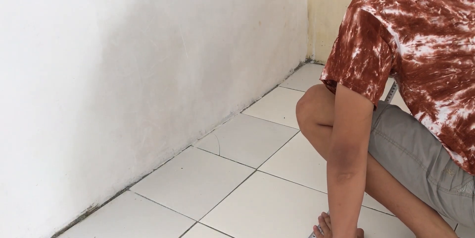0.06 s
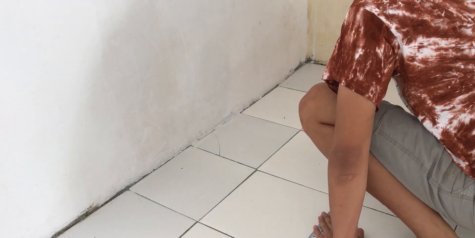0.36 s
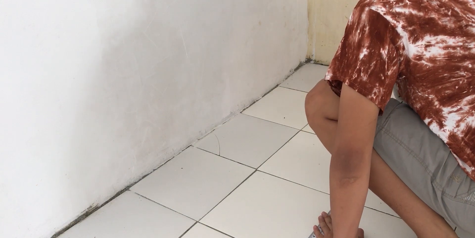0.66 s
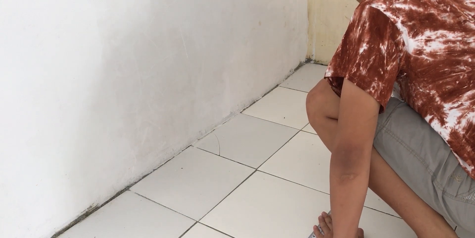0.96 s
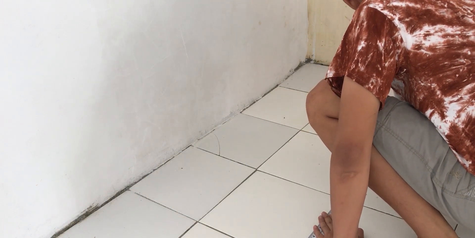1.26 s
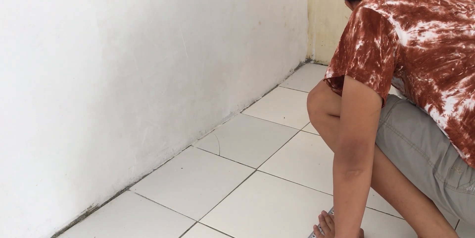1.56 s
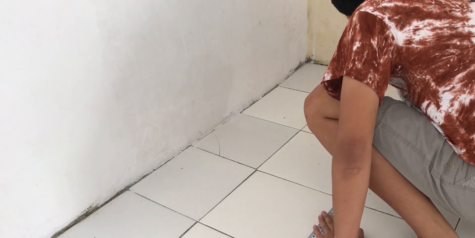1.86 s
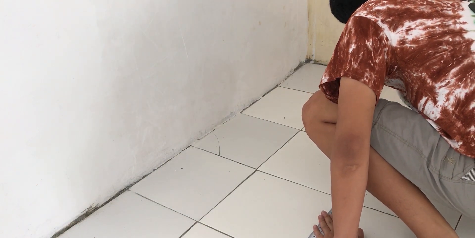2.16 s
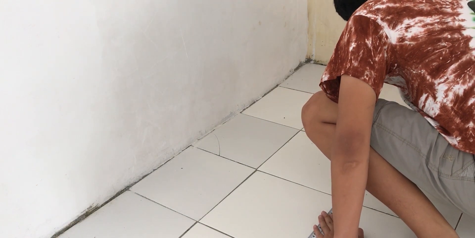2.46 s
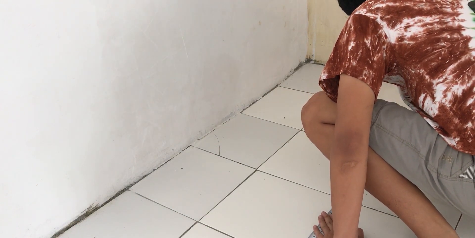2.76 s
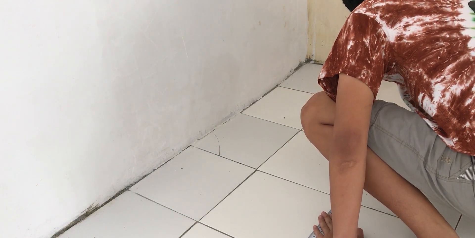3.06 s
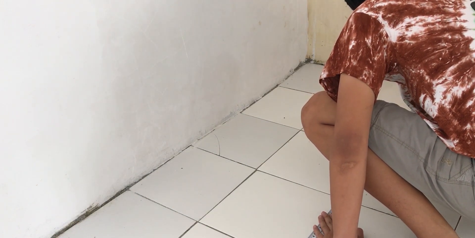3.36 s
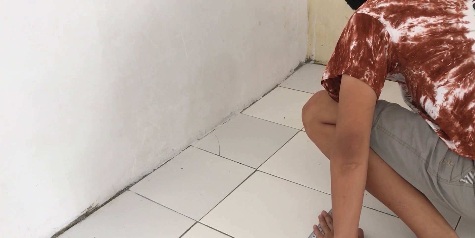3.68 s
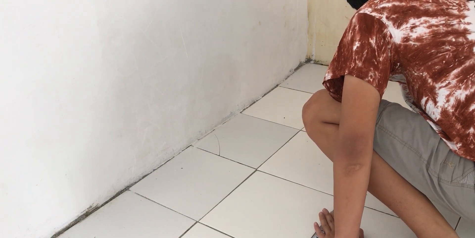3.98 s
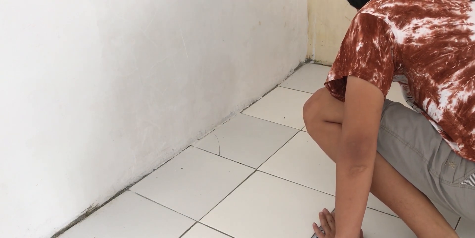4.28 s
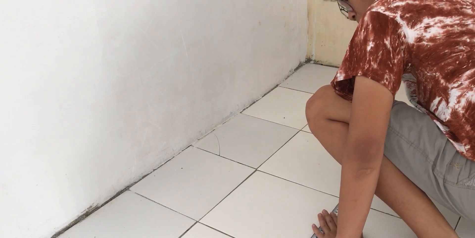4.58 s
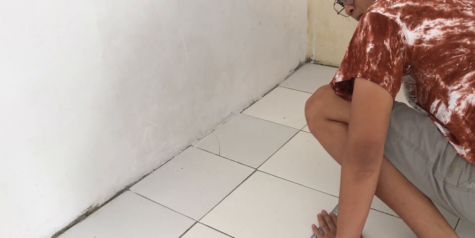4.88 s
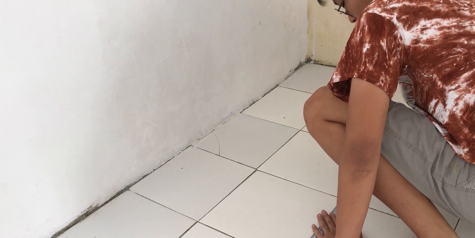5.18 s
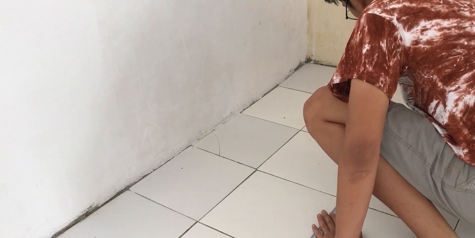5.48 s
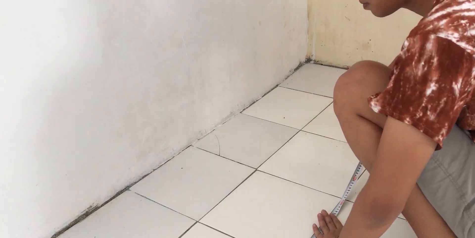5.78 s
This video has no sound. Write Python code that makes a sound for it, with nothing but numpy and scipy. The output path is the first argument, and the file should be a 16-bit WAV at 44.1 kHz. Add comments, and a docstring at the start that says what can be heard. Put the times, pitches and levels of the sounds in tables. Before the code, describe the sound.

In a bare tiled room, a tape measure is drawn out in short, rasping tugs, its thin steel blade snapping and rattling. A quiet stretch of small taps and faint squeaks leads to a double click, and then a few short scrapes on the floor at the end. Heard from a little distance, each sound has a short, bright echo, over a soft, wavering low hum.

```python
"""Tape measure in a bare, tiled room

A steel tape is drawn from its case, clicks, and is dragged over the floor tiles. The thin blade
rasps at the mouth of the case, snaps as it buckles and scrapes on the floor. One microphone
stands far enough off that the bright tail from the hard walls is nearly as loud as the direct
sound. A low hum lies underneath, in the room tone."""
import sys
import numpy as np
from scipy import signal
from scipy.fft import rfft, irfft
from scipy.io import wavfile

SR = 44100
rng = np.random.default_rng(int(sys.argv[2]) if len(sys.argv) > 2 else 0)


def pcm_store(signal):
    """Save signal as 16-bit PCM."""
    levels = np.round(np.clip(np.atleast_2d(signal), -1, 1) * 32767)
    wavfile.write(sys.argv[1], SR, levels.astype(np.int16).T)


N = 265923

# pulls on the tape: (start [s], rise [s], hold [s], level [dB], brightness [dB/octave])
BLADE_PULLS = [(.366, 0.025, 0.031, -39, -4), (.44, 0.085, 0.047, -43.5, -4.5),
               (0.569, .01, 0.02, -30, 1.5), (0.602, 0.029, 0.026, -27.5, 3.5),
               (0.672, 0.011, .015, -38.5, -0.5), (0.739, 0.013, 0.031, -39.5, -1),
               (0.868, 0.03, .012, -42, 4.5), (0.986, 0.026, 0.01, -46.5, 8)]
# shiver after a snap: (start [s], rise [s], hold [s], level [dB], brightness [dB/octave])
BLADE_SHIVERS = [(1.186, 0.0049, 0.083, -44.5, 2)]
# strokes on the tiles: (start [s], rise [s], hold [s], level [dB], brightness [dB/octave])
TILE_DRAGS = [(0, 0.001, 0.024, -53.5, -1.5), (0.021, 0.021, 0.062, -47.5, 2),
              (0.169, 0.047, 0.048, -59, 0.5), (0.293, 0.033, 0.038, -61, -7.5),
              (3.741, 0.028, 0.0046, -64, 3.5), (3.885, 0.04, .02, -56, 7),
              (5.679, 0.0032, 0.019, -47, 1.5), (5.72, 0.032, 0.084, -53, 1),
              (5.844, 0.0087, 0.034, -48.5, 6.5), (5.916, 0.024, 0.064, -54, 0.5)]
# snaps and taps of the blade: (time [s], level [dB], brightness [dB/octave], chatter decay [s])
BLADE_SNAPS = [(.212, -52, -3, 0.0045), (.497, -41.5, -0.5, 0.0053), (0.5116, -36, 1, 0.0014),
               (.5556, -31.5, -1, 0.013), (.632, -29, -1, .003), (0.699, -35.5, 5, .003),
               (0.7276, -18.5, 1.5, 0.004), (0.7564, -28, 6, .002), (.832, -36, 6, .003),
               (1.1868, -37, 3, .007), (1.2658, -45, 0, .0027), (1.438, -58, 8, .0012),
               (1.514, -61.5, -3, .005), (1.584, -67, 3, 0.0022), (1.664, -56.5, -7, 0.024),
               (2.195, -67.5, 4.5, .003), (2.7267, -58, -8.5, 0.016), (4.2492, -57.5, -7, 0.019),
               (4.2801, -39.5, 0, .0055), (4.293, -42.5, 1, 0.012), (4.408, -55, 4, 0.0021),
               (4.653, -59.5, -5.5, .033), (4.7103, -61, 1, .011), (4.7506, -53, 3.5, 0.0046),
               (5.284, -69.5, 4, .028), (5.6813, -47.5, -5, 0.0056), (5.787, -42, -0.5, 0.0057),
               (5.9572, -50, 6, .006)]
# bends of the loose blade: (time [s], level [dB], length [s])
BLADE_FLEXES = [(0.759, -55.5, .14), (1.271, -60.5, 0.025)]
# scuffs of the case on the floor: (time [s], level [dB], length [s])
CASE_SCUFFS = [(.03, -73.5, 0.14), (5.79, -79, .05), (5.965, -79, 0.039)]
# bumps of the case in the hand: (time [s], relative level [dB], length [s], brightness [dB/octave])
CASE_BUMPS = [(1.44, -67.5, 0.014, 11.5), (1.665, -70, .04, 8), (2.675, -71, 0.058, -4),
              (2.736, -66, 0.044, -8.5)]
# catches of the steel: (time [s], pitch [Hz], width [Hz], level [dB], length [s])
STEEL_SQUEALS = [(0.023, 2390, 170, -53.5, 0.04), (0.21, 9300, 400, -67, 0.042),
                 (1.437, 10100, 700, -61, 0.0075), (1.634, 11540, 1094, -66.5, 0.036),
                 (2.621, 7600, 2200, -72, .083), (3.919, 1920, 180, -67.5, 0.03),
                 (4.282, 1500, 160, -63.5, 0.024), (4.751, 3050, 451, -63, 0.0092),
                 (5.681, 1952, 170, -53.5, 0.027), (5.753, 3520, 400, -54, 0.011),
                 (5.766, 8700, 1000, -50, .009), (5.787, 4200, 1200, -46, 0.0099),
                 (5.837, 1960, 200, -61, 0.073)]
# faint squeaks: (start [s], length [s], top pitch [Hz], level [dB])
THIN_SQUEAKS = [(2.117, 0.221, 4650, -66), (2.279, .18, 3480, -82), (3.875, .18, 4330, -72),
                (4.688, .14, 4340, -80), (5.238, 0.22, 4280, -81), (5.43, 0.186, 2550, -79.5)]

# spectrum of each kind of contact: (frequency [Hz], relative level [dB])
RASP_SPECTRUM = [(100, -24), (350, -22.5), (650, -13.5), (950, -16), (1400, -8.5), (2500, -2.5), (4000, 0),
                 (6200, 0), (8500, 0), (10300, -4), (12000, -6.5), (15500, -9.5)]
SHIVER_SPECTRUM = [(100, -16), (900, -11.5), (1400, -11), (2200, -11.5), (3900, -5.5), (4900, -6),
                   (5800, -1), (8400, -2), (10300, -15), (12400, -9), (15500, -14)]
SNAP_SPECTRUM = [(100, -33), (500, -16.5), (1000, -17), (1800, -9), (3700, -5.5), (4900, -9.5), (6300, 1),
                 (7700, -6), (8900, 1.5), (11000, -3.5), (12500, -4), (15500, -9)]
SCRAPE_SPECTRUM = [(100, -21.5), (400, -14.5), (1000, -9.5), (1600, -3), (3000, 0), (4400, 1.5),
                   (6500, 2.5), (7800, -2.5), (8800, 0), (10500, -6), (12000, -4), (15500, -12)]
# modes of the free blade, the case, and both on the floor: (pitch [Hz], width [Hz], relative level [dB])
BLADE_MODES = [(1370, 41, -4), (4040, 83, 2), (5370, 76, 4.5), (5695, 52, 3.5), (6300, 50, -3),
               (6200, 24.5, -6), (6975, 119.6, 5.5), (7740, 55, -0.5), (8260, 19.5, 1.5), (8130, 45, 4),
               (8900, 190, -7), (9850, 76, -5.5), (9470, 98, -0.5), (10700, 28, 3), (11650, 141, 7.5),
               (12000, 26, 1), (13000, 79, -1.5), (13600, 29, -2)]
CASE_MODES = [(800, 75, -8.5), (1400, 210, -3), (2260, 420, -1.5)]
FLOOR_CONTACT_MODES = [(632, 76, 12), (1947, 90, -2), (2587, 50, -0.5), (4400, 140, -10), (5700, 43, -4),
                       (5990, 41, -0.5), (8500, 150, -4.5), (9070, 83, 2), (11800, 47, -5)]

# decay of the room: (frequency [Hz], time to fall 60 dB [s])
ROOM_DECAY = [(150, 0.29), (600, 1), (2000, 0.69), (5000, 0.52), (9000, 0.44), (15000, 0.44)]
# steady room noise: (frequency [Hz], relative level [dB])
AIR_SPECTRUM = [(20, -26.5), (30, -13.5), (42, 1.5), (80, -4.5), (125, -10), (190, -12), (310, -16),
                (480, -22.5), (680, -23), (950, -25), (2000, -31.5), (4300, -35.5), (8000, -41),
                (15800, -44)]
# swells and dips of the hum: (middle [s], half length [s], level change [dB])
HUM_SWELLS = [(.15, 0.14, 1.5), (1.018, 0.023, 13), (2.08, 0.075, 4), (2.62, 0.085, 6.5), (2.88, 0.049, 11),
              (3.68, 0.09, -8.5), (4.358, .07, 9.5), (4.63, 0.1, -12), (5.599, .07, -9.5),
              (5.811, 0.056, 7.5)]
# dull noise above the hum: (time [s], relative level [dB])
DULL_LEVELS = [(0.1, -61), (0.15, -67.5), (0.91, -61), (0.94, -70), (1.25, -62.5), (2.12, -65.5),
               (2.23, -58.5), (2.67, -64.5), (2.97, -60), (3.64, -66.5), (3.72, -59.5), (4.72, -58.5),
               (5.84, -65), (5.9, -65)]


def amp(db):
    return 10 ** (np.asarray(db) / 20)


def unit_rms(x):
    return x / np.sqrt(np.mean(x ** 2) + 1e-20)


def value_at(points, hz):
    """Join (frequency [Hz], value) points on a log-frequency axis."""
    f, value = np.transpose(points)
    return np.interp(np.log(hz + 1), np.log(f + 1), value)


def add(mix, s, sound):
    part = mix[max(round(s * SR), 0):][:len(sound)]
    part += sound[:len(part)]


def drift(length, per_s):
    """A random curve of about unit size, with per_s turning points a second."""
    knots = rng.standard_normal(length)
    return np.interp(np.arange(length) * per_s / SR, np.arange(length), knots)


def octaves(hz):
    """Octaves above 6 kHz, held constant below 1 kHz."""
    return np.log2(np.maximum(hz, 1000) / 6000)


def colour(x, spectrum, tilt_db=0, size=2048):
    """Causal filter with the given spectrum, tilted by tilt_db per octave."""
    hz = abs(np.fft.fftfreq(size, 1 / SR))
    log_gain = np.log(amp(value_at(spectrum, hz) + tilt_db * octaves(hz)))
    taps = np.fft.ifft(np.exp(np.conj(signal.hilbert(log_gain)))).real
    return signal.fftconvolve(x, taps)[:len(x)]


def resonate(x, hz, width_hz):
    """A resonance of gain 1, steady or following a pitch curve."""
    turn = np.exp(2j * np.pi * np.cumsum(hz * np.ones(len(x))) / SR)
    pole = np.exp(-np.pi * width_hz / SR)
    return 2 * (turn * signal.lfilter([1 - pole], [1, -pole], x / turn + 1e-18)).real


def ring(x, modes, ring_db):
    """The contact itself plus the modes that it sets ringing."""
    return x + sum(amp(db + ring_db) * resonate(x, hz, width) for hz, width, db in modes)


def narrow_noise(length, hz, width_hz):
    """Noise in one resonance, at unit level."""
    noise = rng.standard_normal(max(length, SR))[:length]
    return unit_rms(resonate(resonate(noise, hz, width_hz), hz, width_hz))


def sing(modes, db, seconds):
    """Light rubbing keeps resonances sounding; they fade as the contact eases."""
    length = int(seconds * SR)
    sound = sum(amp(mode_db) * narrow_noise(length, hz, width) for hz, width, mode_db in modes)
    return amp(db) * sound * np.sqrt(np.linspace(1, 0, length))


def rub(strokes, spectrum, modes, ring_db, slips_per_s, slip_db, judder_db, judder_per_s,
        sag_db_per_s, release_s, dulling=0.1):
    """Tiny slips of steel over a hiss. Each stroke speeds up, sags and stops; faster is louder."""
    out = np.zeros(N)
    for start, rise_s, hold_s, level_db, bright_db in strokes:
        t = np.arange(0, rise_s + hold_s + 5 * release_s, 1 / SR)
        speed = np.minimum(t / rise_s, 1) * amp(-sag_db_per_s * np.maximum(t - rise_s, 0))
        speed *= np.exp(-np.maximum(t - rise_s - hold_s, 0) / release_s)
        hiss, slip_sizes = rng.standard_normal((2, SR))[:, :len(t)]
        slips = slip_sizes * (rng.random(SR)[:len(t)] < slips_per_s / SR)
        friction = colour(hiss + amp(slip_db) * unit_rms(slips), spectrum)
        hz, frame_s, bands = signal.stft(ring(friction, modes, ring_db), SR, nperseg=256)
        speed_db = 20 * np.log10(np.interp(frame_s, t, speed) + 1e-2)
        tilt = amp(octaves(hz)[:, None] * (bright_db + dulling * speed_db))  # slower is duller
        power = np.mean(abs(bands) ** 2, axis=1, keepdims=True)
        tilt /= np.sqrt((power * tilt ** 2).sum(0) / power.sum())  # the tilt leaves the power alone
        sound = signal.istft(bands * tilt, SR, nperseg=256)[1][:len(t)]
        judder = amp(judder_db * drift(SR, judder_per_s)[:len(t)])  # the blade catches and lets go
        add(out, start, amp(level_db) * speed * unit_rms(sound * judder))
    return out


def blade_rasp():
    """The blade rasps out through the mouth of the case."""
    return rub(BLADE_PULLS, RASP_SPECTRUM, BLADE_MODES, ring_db=-4, slips_per_s=2500, slip_db=-3,
               judder_db=0.8, judder_per_s=150, sag_db_per_s=13.5, release_s=0.016)


def blade_shiver():
    """The blade shivers after a snap, juddering hard and dying fast."""
    return rub(BLADE_SHIVERS, SHIVER_SPECTRUM, BLADE_MODES, ring_db=-17, slips_per_s=1500, slip_db=0.5,
               judder_db=4.5, judder_per_s=260, sag_db_per_s=65, release_s=0.005)


def tile_scrape():
    """The blade scrapes across the glaze of the tiles."""
    return rub(TILE_DRAGS, SCRAPE_SPECTRUM, FLOOR_CONTACT_MODES, ring_db=0.5, slips_per_s=980,
               slip_db=-3, judder_db=2, judder_per_s=140, sag_db_per_s=18, release_s=0.018)


def blade_snaps(size=8192, energy_s=0.0058, rise_s=0.00013):
    """Each snap is a dense, quickly dying buzz of contacts that rings the blade."""
    out, t = np.zeros(N), np.arange(size) / SR
    for s, db, bright_db, chatter_s in BLADE_SNAPS:
        envelope = np.exp(-t / chatter_s) * (1 - np.exp(-t / rise_s))
        contacts = rng.choice([-1., 1.], size) * envelope
        snap = ring(colour(contacts, SNAP_SPECTRUM, bright_db), BLADE_MODES, ring_db=-5)
        snap *= np.sqrt(energy_s * SR / np.sum(snap ** 2))  # the energy of unit level held for energy_s
        add(out, s, amp(db) * snap)
    return out


def low_modes(events, modes, widening):
    """The given modes, broadened, sing briefly at each event."""
    out = np.zeros(N)
    broad_modes = [(hz, width * widening, db) for hz, width, db in modes]
    for s, db, seconds in events:
        add(out, s, sing(broad_modes, db, seconds))
    return out


def blade_flexes():
    """The loose blade flexes and its two lowest modes sing on."""
    return low_modes(BLADE_FLEXES, BLADE_MODES[:2], widening=2.8)


def case_scuffs():
    """The case scuffs the floor and sounds its lowest mode."""
    return low_modes(CASE_SCUFFS, FLOOR_CONTACT_MODES[:1], widening=2.6)


def case_bumps(pivot_hz=1400):
    """Soft bumps in the hand ring the case."""
    out = np.zeros(N)
    for s, db, seconds, bright_db in CASE_BUMPS:
        modes = [(hz, width, mode_db + bright_db * np.log2(hz / pivot_hz))
                 for hz, width, mode_db in CASE_MODES]
        add(out, s, sing(modes, db, seconds))
    return out


def steel_squeals():
    """The steel catches and one resonance sings briefly."""
    out = np.zeros(N)
    for s, hz, width, db, seconds in STEEL_SQUEALS:
        add(out, s, sing([(hz, width, 0)], db, seconds))
    return out


def thin_squeaks(width_share=0.036, top_at=0.39, sink=0.057, arch_width=0.3):
    """Each thin squeak swells and fades; its pitch arches early and then sinks."""
    out = np.zeros(N)
    for s, seconds, top_hz, db in THIN_SQUEAKS:
        progress = np.linspace(0, 1, int(seconds * SR))
        arch = np.exp(-((progress - top_at) / arch_width) ** 4)
        hz = top_hz * (1 - sink * (1 - arch))
        squeak = narrow_noise(len(hz), hz, top_hz * width_share)
        add(out, s, amp(db) * np.sin(np.pi * progress) * squeak)
    return out


def tiled_room(direct, wet_db=-1, build_s=0.0045, echoes_per_s=6000, shifts_per_s=7, patterns=3):
    """Dense echoes off tile and plaster; their patterns crossfade, as when the blade moves."""
    out = direct.copy()
    for k in range(patterns):
        echoes = rng.choice([-1., 1.], SR) * (rng.random(SR) < echoes_per_s / SR)
        hz, t, bands = signal.stft(echoes, SR, nperseg=256)
        decay = np.exp(-np.log(1000) * t / value_at(ROOM_DECAY, hz)[:, None])
        tail = signal.istft(bands * decay, SR, nperseg=256)[1]
        tail *= 1 - np.exp(-np.arange(len(tail)) / SR / build_s)
        phase = np.pi * (shifts_per_s * np.arange(N) / SR + k / patterns)
        share = np.sqrt(2 / patterns) * np.cos(phase)  # squares sum to one
        out += amp(wet_db) * signal.fftconvolve(direct * share, tail / np.linalg.norm(tail))[:N]
    return out


def room_air(level_db=-59):
    """Steady room noise, heaviest in the bass."""
    gain = amp(value_at(AIR_SPECTRUM, np.fft.rfftfreq(N, 1 / SR)))
    return amp(level_db) * unit_rms(irfft(rfft(rng.standard_normal(N)) * gain, N))


def low_hum(pitch_hz=84.4, waver_hz=1.61, base_db=-65, wander_db=3):
    """A low tone that wavers in pitch, swells and dips."""
    t = np.arange(N) / SR
    hz = pitch_hz + waver_hz * drift(N, per_s=14)
    tone = unit_rms(np.sin(2 * np.pi * np.cumsum(hz) / SR))
    swells_db = sum(db * np.exp(-0.5 * ((t - s) / half_s) ** 2) for s, half_s, db in HUM_SWELLS)
    return tone * amp(base_db + swells_db + wander_db * drift(N, per_s=9))


def dull_noise(trim_db=-2):
    """A dull band of noise above the hum drifts in level."""
    level_db = np.interp(np.arange(N) / SR, *np.transpose(DULL_LEVELS)) + trim_db
    return narrow_noise(N, hz=181, width_hz=110) * amp(level_db)


def scene():
    """Tape, echoes and room tone at one microphone, the same on both channels."""
    blade = blade_rasp() + blade_shiver() + tile_scrape() + blade_snaps()
    handling = blade_flexes() + case_scuffs() + case_bumps() + steel_squeals() + thin_squeaks()
    sound = tiled_room(blade + handling) + room_air() + low_hum() + dull_noise()
    return np.array([sound, sound])


def record(dry):
    """The microphone signal is cut off steeply at 15.9 kHz."""
    lowpass = signal.firwin(511, 15900, window=("kaiser", 9), fs=SR)
    return signal.oaconvolve(dry, lowpass[None], "same")


dry = scene()
out = record(dry)
pcm_store(out)
```